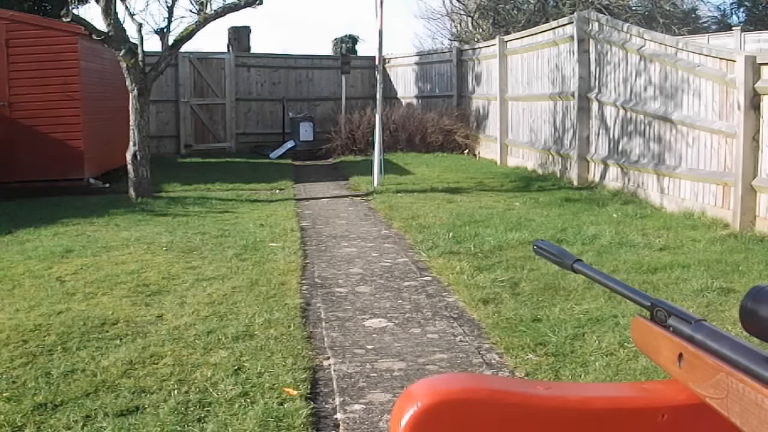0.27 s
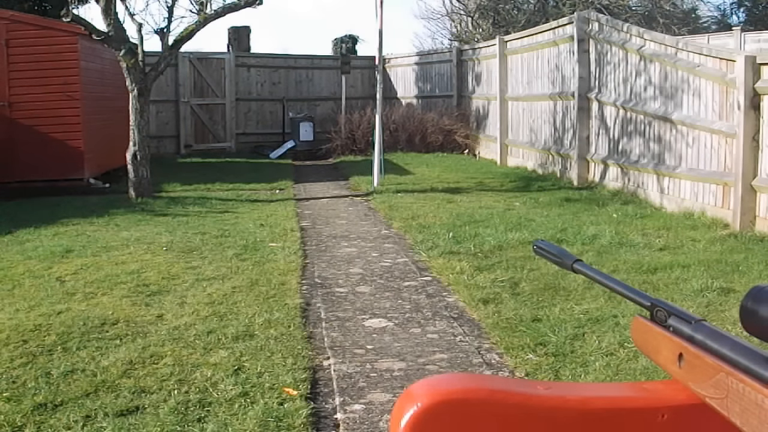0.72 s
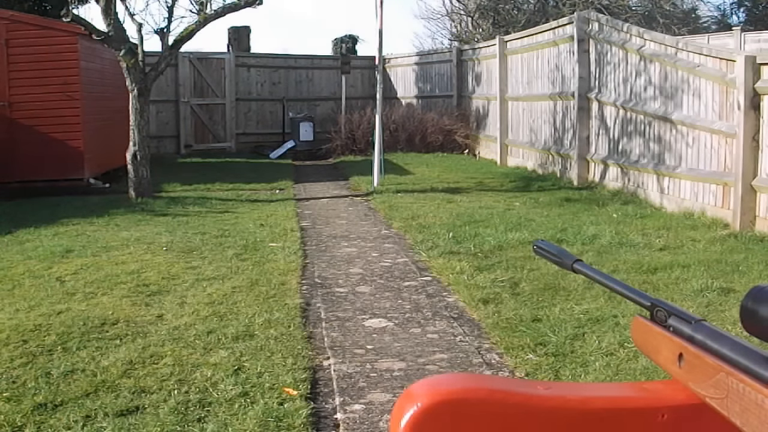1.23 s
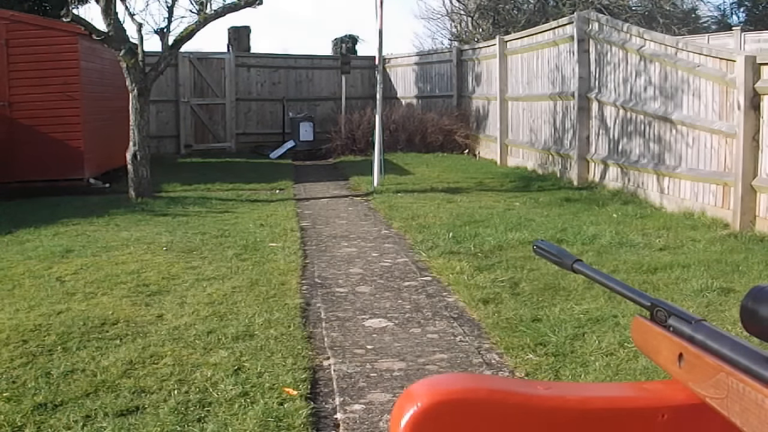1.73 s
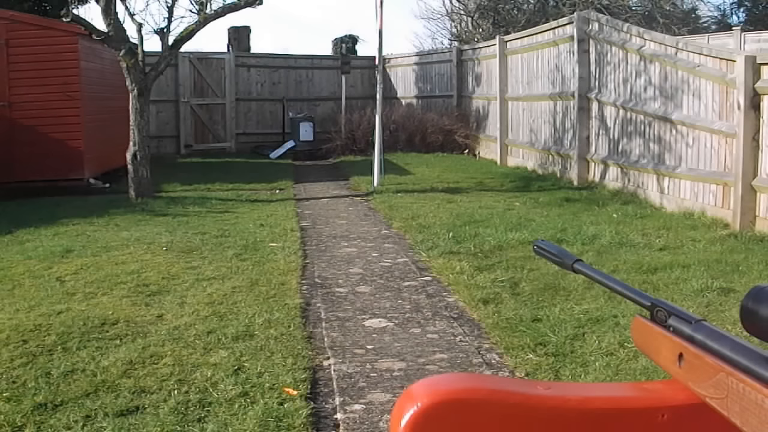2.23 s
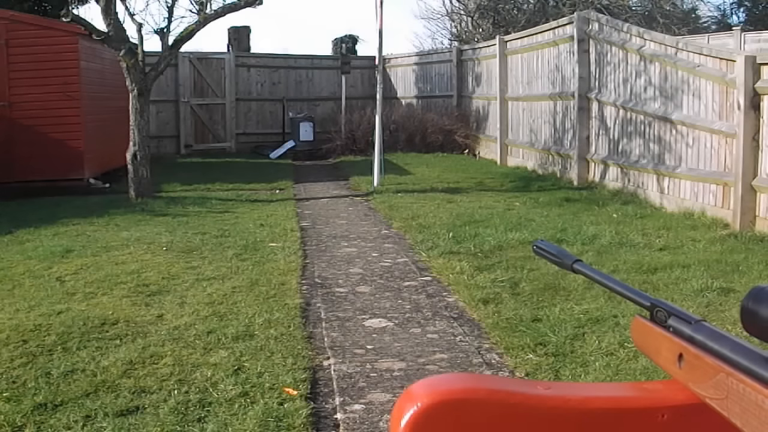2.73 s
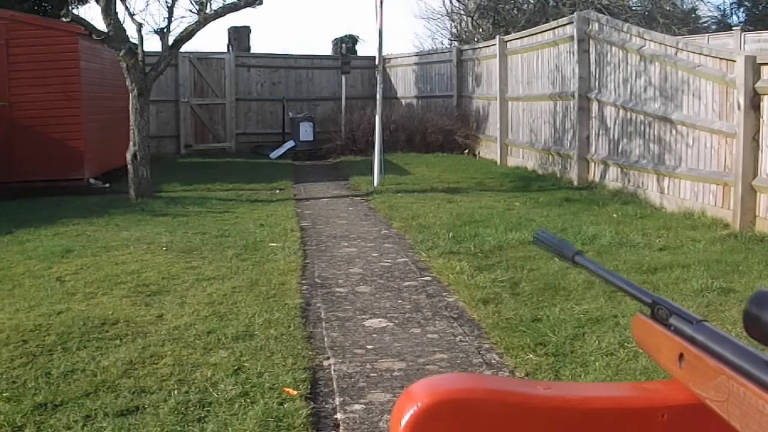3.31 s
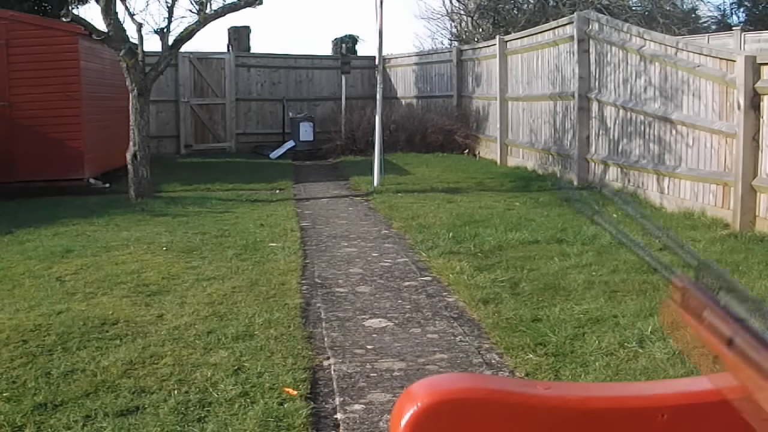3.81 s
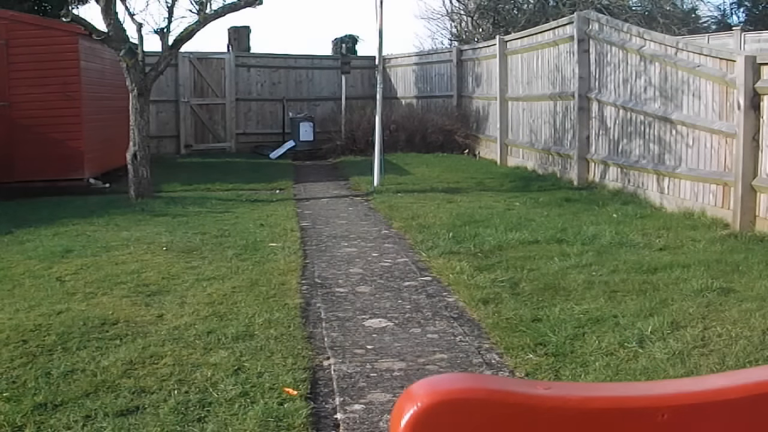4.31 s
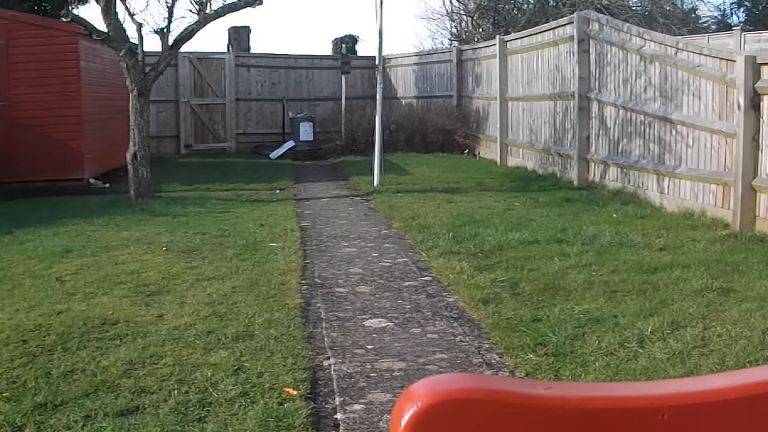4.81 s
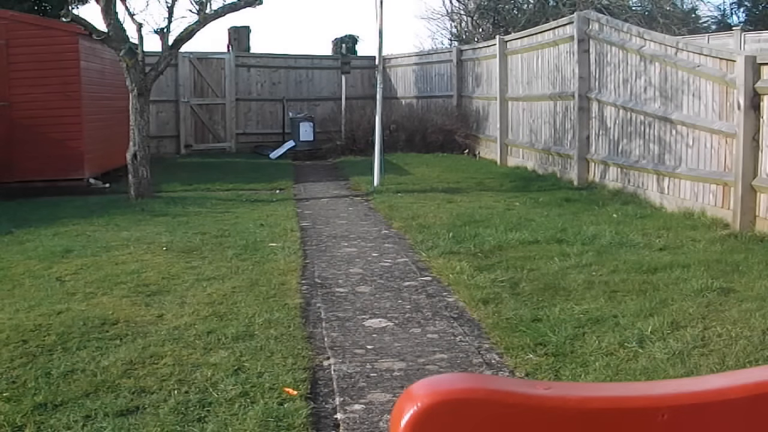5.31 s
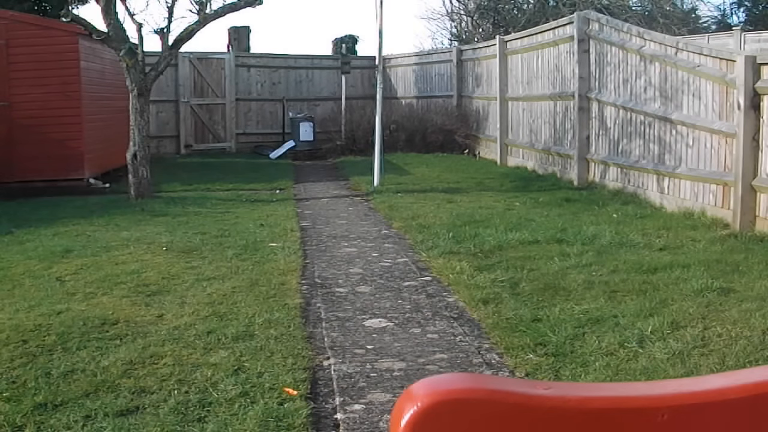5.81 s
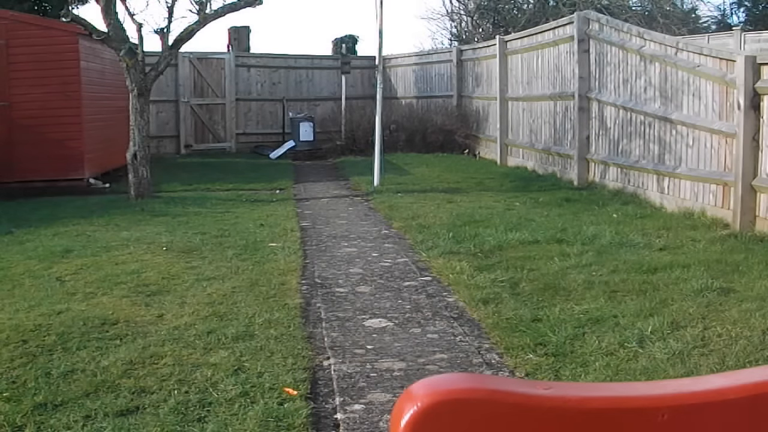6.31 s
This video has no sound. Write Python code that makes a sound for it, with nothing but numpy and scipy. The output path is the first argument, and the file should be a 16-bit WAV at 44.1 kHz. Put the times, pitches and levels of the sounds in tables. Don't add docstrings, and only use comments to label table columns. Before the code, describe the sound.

Faint birdsong over low traffic rumble, one loud spring air rifle shot with a target smack and short echoes, then soft rubbing and steel handling clacks.

```python
import sys
import numpy as np
from scipy import signal
from scipy.fft import rfft, irfft
from scipy.io import wavfile
from scipy.ndimage import uniform_filter1d

SR = 44100
rng = np.random.default_rng(int(sys.argv[2]) if len(sys.argv) > 2 else 0)


def field_ratio(decibels):
    return 10 ** (np.asarray(decibels, dtype=float) / 20)


def dump(signal):
    limited = np.clip(np.atleast_2d(signal).T, -1, 1)
    pcm = np.round(limited * 32767).astype(np.int16)
    wavfile.write(sys.argv[1], SR, pcm)


N = 288855
T = np.arange(N) / SR
FADE = np.log(1000)


def unit(x):
    return x / np.sqrt(np.mean(x ** 2))


def colour(x, table):
    hz, db = np.transpose(table)
    bins = np.fft.rfftfreq(x.shape[-1], 1 / SR) + 1
    gain = field_ratio(np.interp(np.log(bins), np.log(hz), db))
    return irfft(rfft(x) * gain, x.shape[-1])


def ring(x, hz, width):
    return signal.lfilter(*signal.iirpeak(min(hz, 0.45 * SR), hz / width, SR), x)


def dull(x, hz):
    return signal.sosfilt(signal.butter(3, hz, fs=SR, output="sos"), x)


def add(track, s, sound):
    i = int(s * SR)
    track[i:i + len(sound)] += sound[:N - i]


def walk(rate):
    k = int(SR / rate)
    steps = np.repeat(rng.standard_normal(N // k + 1), k)
    return unit(uniform_filter1d(uniform_filter1d(steps, k), k)[:N])


# pitch_hz [Hz], level_db [dB per Hz]
ENGINE_SPECTRUM = [(12, -38), (20, -6.5), (70, 2), (201, -25), (241, -21.5), (289, -28.5), (380, -30.5),
                   (450, -31), (580, -47), (990, -120)]
# pitch_hz [Hz], level_db [dB per Hz]
TYRE_SPECTRUM = [(210, -42.5), (360, -17.5), (480, -6), (650, -3), (967, 1), (1400, -7), (2000, -12.5),
                 (2900, -23), (4000, -28.5), (5200, -29.5), (6830, -37.5), (9680, -36.5), (11500, -28.5),
                 (12700, -40), (15600, -43)]
# [dB, tyre roar]
SWELL = [(0, -41), (.31, -39), (.67, -43), (1.78, -42.5), (2.4, -40.5), (2.75, -41.5), (3.7, -43),
         (4.18, -38.5), (4.4, -42.5), (4.75, -43), (5.07, -42.5), (5.3, -38), (5.5, -41.5), (5.7, -40.5),
         (5.88, -45), (6.55, -45)]


def traffic():
    s, roar_db = np.transpose(SWELL)
    mean_db = roar_db.mean()
    swell_db = np.interp(T, s, roar_db - mean_db)
    rumble = unit(colour(rng.standard_normal(N), ENGINE_SPECTRUM))
    rumble = rumble * field_ratio(-29 + 0.3 * swell_db + 0.2 * walk(11))
    road = unit(colour(rng.standard_normal(N), TYRE_SPECTRUM)) * field_ratio(mean_db + 1.5)
    roar, tyres = dull(road, 1450), dull(road, 3800)
    flicker_db = 0.68 * walk(7)
    moving_roar = roar * field_ratio(swell_db + flicker_db)
    moving_hiss = (tyres - roar) * field_ratio(0.55 * swell_db + flicker_db)
    return rumble + moving_roar + moving_hiss + road - tyres


# pitch_hz [Hz], level_db [dB rms]
WHINE = [
    (11360, -64),
    (10100, -83.5),
    (15350, -86.5),
]


def whine():
    out = np.zeros(N)
    for hz, db in WHINE:
        level = np.sqrt(2) * field_ratio(db + 1.1 * walk(60))
        phase = 2 * np.pi * np.cumsum(hz + 12 * walk(80)) / SR
        out += level * np.sin(phase)
    return out


# start_s [s], length_s [s], first_hz [Hz], last_hz [Hz], level_db [dB]
WHISTLES = [(.03, 0.12, 5220, 4800, -54.5), (.04, .09, 3960, 4040, -64), (.125, .035, 4150, 4250, -60),
            (.19, 0.042, 3300, 3290, -57), (.22, .11, 4180, 4020, -64), (.35, .062, 4530, 4500, -59),
            (.27, .14, 3240, 3210, -67), (.45, .14, 4050, 4020, -67), (.28, .08, 3700, 3650, -68),
            (.36, 0.057, 3620, 3490, -58), (.92, 0.13, 5250, 5340, -63), (.968, .037, 3360, 2480, -48),
            (1.15, .055, 4900, 4900, -65), (1.535, .05, 6050, 5300, -66), (1.79, 0.036, 4700, 4900, -64),
            (1.84, .06, 4800, 4800, -68), (1.97, .11, 5850, 5680, -69), (2.14, .068, 5060, 5130, -62),
            (2.22, 0.025, 5100, 5100, -60), (2.27, .029, 5070, 4800, -62), (2.395, .11, 5500, 5590, -64.5),
            (2.69, 0.052, 4800, 5200, -67), (5.05, .08, 4510, 4400, -66)]
# start_s [s], length_s [s], first_hz [Hz], last_hz [Hz], level_db [dB]
CHIRPS = [
    (.52, 0.12, 5340, 5300, -60),
    (1.03, 0.033, 5150, 5330, -59),
    (1.116, 0.039, 5930, 5200, -66),
    (1.348, .04, 4750, 4500, -63),
    (1.375, 0.046, 4530, 5220, -61),
    (1.44, .035, 5350, 4750, -62),
    (1.68, .015, 5700, 5270, -63),
    (1.62, .02, 5400, 5800, -68),
    (1.66, .07, 4670, 4800, -66),
    (1.92, .05, 5840, 6100, -68),
]


def birds():
    out, flutter = np.zeros(N), walk(400)
    for notes, warble_hz in (WHISTLES, 50), (CHIRPS, 240):
        for s, length, first_hz, last_hz, db in notes:
            t = T[:int(length * SR)]
            glide_hz = first_hz + (last_hz - first_hz) * t / length
            hz = glide_hz + warble_hz * flutter[int(s * SR):][:len(t)]
            swell = np.sin(np.pi * t / length) ** 0.5
            add(out, s, field_ratio(db) * swell * np.sin(2 * np.pi * np.cumsum(hz) / SR))
    out = out * field_ratio(2.5 * walk(70))
    t = T[:SR // 5]
    blur = rng.standard_normal(len(t)) * np.exp(-FADE * t / 0.57)
    return np.sqrt(2) * out + field_ratio(-36) * signal.fftconvolve(out, blur)[:N]


# pitch_hz [Hz], level_db [dB per Hz]
CRACK = [(180, -35.5), (300, -4), (1220, -0.5), (3580, -3), (4090, 0), (5780, -4.5), (7790, -8.5),
         (12200, -14), (15600, -25)]


def blows(table, breadth, crack_db, rise_s=0.0003, strike=0.0):
    out, t = np.zeros(N), T[:SR // 3]
    rattles = colour(rng.standard_normal((len(table), len(t))), CRACK)
    for (s, db, hz, t60), rattle in zip(table, rattles):
        push = unit(rattle) * np.minimum(t / rise_s, 1) * np.exp(-FADE * t / t60)
        push = push * (1 + strike * np.exp(-t / 0.001))
        body = ring(push, hz, breadth * hz)
        sound = body / np.std(body) + field_ratio(crack_db) * push / np.std(push)
        add(out, s, field_ratio(db) * sound / np.abs(sound).max())
    return out


def rubs(table, crack_db, rise_s):
    return blows([(s, db, 4900, t60) for s, db, t60 in table], 0.52, crack_db, rise_s)


# [s, rattle]
LIFTING = [(1.895, -49, .02), (3.370, -40, .027), (3.393, -37, 0.011), (3.400, -36.5, 0.55),
           (3.472, -34.5, 0.055), (3.745, -37, 0.16), (3.878, -45, .04), (4.120, -43, 0.37),
           (4.228, -40.5, 0.14), (4.638, -43, 0.19), (5.750, -43.5, .09), (5.930, -44, 0.079),
           (6.020, -45, .07)]


def lifting():
    return dull(rubs(LIFTING, crack_db=3.0, rise_s=0.013), 6300)


def thumps(table):
    out, t = np.zeros(N), T[:SR // 3]
    for s, db, hz, t60, swing in table:
        wave = np.sin(2 * np.pi * hz * t) * np.exp(-FADE * t / t60)
        add(out, s, np.sign(swing) * field_ratio(db) * wave)
    return out


# [s, rattle]
SHOT = [
    (2.7874, -6, 5010, .008),
    (2.7893, -1, 6540, 0.011),
    (2.7903, 2.5, 7500, 0.039),
    (2.7990, -8, 3027, 0.025),
    (2.8035, 12.5, 4300, 0.026),
    (2.8085, 3, 4940, 0.019),
    (2.8120, -1, 4800, .018),
]
# start_s [s], level_db [dB], pitch_hz [Hz], t60_s [s], swing [+1 or -1]
THUMPS = [
    (2.7998, -2.5, 345, .061, -1),
    (2.7994, -5.5, 445, .1, -1),
    (2.8031, 13.5, 106, .011, 1),
    (2.8023, -7.5, 65, .1, 1),
    (5.3560, -26, 240, .1, 1),
]
# start_s [s], level_db [dB], pitch_hz [Hz], t60_s [s], swing [+1 or -1]
TUBE = [
    (2.7875, -7, 5000, .008, 1),
    (2.7903, 5, 5165, .028, 1),
    (5.5060, -46, 6060, .42, 1),
    (5.5060, -40, 2700, .25, 1),
]


def shot():
    return blows(SHOT, 0.8, crack_db=-0.4) + thumps(THUMPS) + thumps(TUBE)


def fronts(table):
    clicks = np.zeros(N)
    for s, db, *_ in table:
        clicks[int(s * SR)] = field_ratio(db)
    return colour(clicks, CRACK)


# pitch_hz [Hz], level_db [dB], t60_s [s]
GARDEN = [(257, -25.5, .9), (600, -24.5, 0.49), (1411, -27.5, 0.9), (2707, -22.5, 1), (4800, -21.5, 0.72),
          (7500, -33, .36), (11000, -26.5, .38), (14500, -22.5, .3)]


def garden(x, tail_db):
    t, reply = T[:int(1.5 * SR)], 0
    octaves = np.log2(np.fft.rfftfreq(len(t), 1 / SR) + 1)
    for hz, db, t60 in GARDEN:
        window = np.exp(-((octaves - np.log2(hz)) / 0.61) ** 2)
        band = irfft(rfft(rng.standard_normal(len(t))) * window, len(t))
        reply = reply + field_ratio(db + tail_db) * band * np.exp(-FADE * t / t60)
    reach = np.exp(-(t / 0.36) ** 2)
    return signal.fftconvolve(x, reply * np.minimum(t / 0.037, 1) * reach)[:N]


# [s, rattle]
SHOT_ECHOES = [
    (2.8300, 1.5, 2520, .012),
    (2.8335, 2.5, 5570, 0.019),
    (2.8476, -1, 4530, 0.0055),
    (2.8610, 9.5, 4530, .007),
    (2.8720, 3.5, 1800, 0.0087),
    (2.8980, 5, 4050, 0.021),
]


def shot_echoes():
    return dull(blows(SHOT_ECHOES, 0.38, crack_db=-8), 6000)


# [s, rattle]
PELLET = [
    (2.9150, 12.5, 810, 0.034),
    (2.9170, 11, 5100, 0.24),
    (2.9245, 11, 2840, 0.029),
    (2.9934, 7.5, 3630, 0.017),
    (3.0080, -5.5, 4560, 0.14),
    (3.0910, -13, 4040, 0.025),
    (3.1920, -21, 2500, 0.02),
]


def pellet():
    return dull(blows(PELLET, 0.23, crack_db=2.5), 6500)


# start_s [s], level_db [dB peak], lowest_hz [Hz], highest_hz [Hz]
TICKS = [
    (2.9150, 11, 2000, 11000),
    (5.3557, -21, 2980, 13000),
    (5.4053, -14, 11800, 15440),
    (5.5039, -21, 2980, 9000),
    (6.1394, -23.5, 6850, 14000),
    (6.2867, -2, 6060, 13500),
    (6.4882, -17, 8400, 14960),
]


def ticks():
    out, t = np.zeros(N), T[:SR // 50]
    noises = rng.standard_normal((len(TICKS), len(t)))
    for (s, db, *band_hz), noise in zip(TICKS, noises):
        band = signal.butter(3, band_hz, "band", fs=SR, output="sos")
        tick = signal.sosfilt(band, noise * np.exp(-FADE * t / 0.011))
        add(out, s, field_ratio(db) * tick / np.abs(tick).max())
    return out


# [s, rattle]
COCKING = [(5.3750, -15, 5800, .04), (5.4057, 2, 4260, 0.021), (5.4280, -22, 5800, .03),
           (5.4700, -28, 3300, .03), (5.5038, -4.5, 4520, 0.029), (5.6800, -32.5, 4800, .032),
           (6.0925, -19.5, 5840, .03), (6.1327, -15, 5950, .043), (6.1395, -7, 5940, 0.036),
           (6.1703, -33, 5730, 0.069), (6.2030, -39, 5670, 0.25), (6.2848, 0.5, 5250, 0.035),
           (6.4876, -7.5, 5130, 0.034)]
# [s, rattle]
KNOCKS = [
    (5.3570, -15, 1180, 0.076),
    (5.3846, -11, 1610, 0.061),
    (5.4060, -22, 1300, 0.062),
    (5.5045, -18, 1710, 0.084),
    (5.6794, -24, 1590, 0.041),
    (6.2731, -29, 2500, 0.016),
    (6.2855, -19, 1300, 0.051),
]
# [s, rattle]
SCRAPES = [
    (5.3557, -10.5, 0.048),
    (5.3920, -8.5, 0.023),
    (6.1192, -24.5, 0.033),
    (6.4790, -13.5, 0.082),
    (6.5200, -32, .08),
]


def cocking():
    steel = blows(COCKING, 0.36, crack_db=-10, strike=0.52)
    wood = blows(KNOCKS, 0.23, crack_db=-10, strike=0.88)
    grating = rubs(SCRAPES, crack_db=20, rise_s=0.00059)
    return dull(steel + wood + grating, 8000)


# delay_s [s], level_db [dB]
FENCES = [
    (.024, -38),
    (0.033, -21),
    (.064, -21),
]


def fences(x):
    t = T[:SR // 50]
    smear = field_ratio(-18) * rng.standard_normal(len(t)) * np.exp(-FADE * t / 0.0092)
    smeared = signal.fftconvolve(ring(x, 3300, 5000), smear)[:N]
    return sum(field_ratio(db) * np.pad(smeared, (int(s * SR), 0))[:N] for s, db in FENCES)


# start_s [s], pitch_hz [Hz], width_hz [Hz], level_db [dB], t60_s [s]
BARREL = [(5.41, 3180, 900, -29, 0.3), (5.41, 4360, 400, -29, 0.1), (5.41, 5760, 500, -34, 0.2),
          (5.41, 8400, 2500, -42, 0.27), (5.506, 5600, 1500, -52, 0.27), (5.506, 4400, 500, -32, 0.17),
          (6.29, 4120, 260, -36.5, 0.61), (6.29, 5000, 250, -39, .35), (6.29, 6140, 220, -37, 0.42),
          (6.29, 7200, 260, -43, 0.47), (6.29, 8450, 350, -38, 0.34), (6.29, 3200, 1500, -40, 0.38),
          (6.29, 10500, 3500, -44, 0.55)]


def barrel():
    out, t = np.zeros(N), T[:SR // 2]
    noises = rng.standard_normal((len(BARREL), len(t)))
    for (s, hz, width, db, t60), noise in zip(BARREL, noises):
        band = unit(ring(ring(noise, hz, width), hz, width))
        add(out, s, field_ratio(db) * band * np.minimum(t / 0.0023, 1) * np.exp(-FADE * t / t60))
    return out * field_ratio(3.1 * walk(180) - 5)


# start_s [s], pitch_hz [Hz], level_db [dB], overtone_db [dB]
SQUEAK = [
    (6.195, 1078, -39, -77),
    (6.215, 922, -47, -41),
    (6.243, 665, -33, -41),
    (6.263, 860, -40, -43),
    (6.272, 922.9, -48, -39),
]


def hinge():
    s, hz, db, second_db = np.transpose(SQUEAK)
    phase = 2 * np.pi * np.cumsum(np.interp(T, s, hz)) / SR
    gate = np.clip(np.minimum(T - s[0], s[-1] - T) / 0.0035, 0, 1)
    tone = field_ratio(np.interp(T, s, db)) * np.sin(phase)
    overtone = field_ratio(np.interp(T, s, second_db)) * np.sin(2 * phase)
    return np.sqrt(2) * gate * field_ratio(1.5 * walk(150) - 0.5) * (tone + overtone)


def scene():
    background = traffic() + whine() + birds()
    clacks = cocking()
    rifle = lifting() + shot() + ticks() + clacks + fences(clacks) + barrel() + hinge()
    far_shot = field_ratio(20.5) * fronts(SHOT)
    far_pellet = field_ratio(15.0) * dull(fronts(PELLET), 8300)
    far = far_shot + far_pellet + field_ratio(-18.5) * clacks
    space = shot_echoes() + garden(far, tail_db=-10)
    return (background + rifle + pellet() + space)[None]


def low_pass(x):
    return signal.sosfilt(signal.butter(12, 15740, fs=SR, output="sos"), x)


def record(dry):
    duck_s, attack_s, hold_s, release_s = 2.803, 0.019, 0.45, 0.177
    duck_db, creep_db = -13.5, 3.5
    corners_s = duck_s + np.cumsum([0, attack_s, hold_s, release_s])
    gain_db = np.interp(T, corners_s, [0, duck_db, duck_db + creep_db, 0])
    mix = np.clip(dry * field_ratio(gain_db), -0.97, 0.97)
    return low_pass(mix)


dry = scene()
out = record(dry)
dump(out)
```